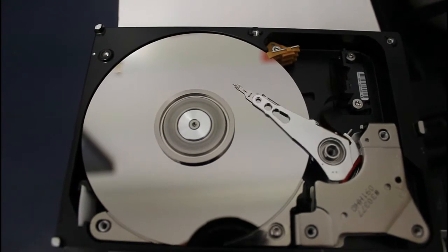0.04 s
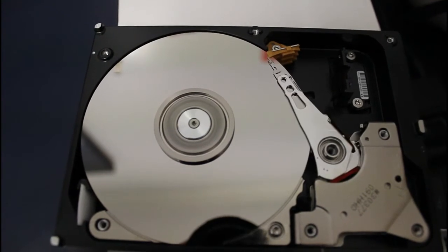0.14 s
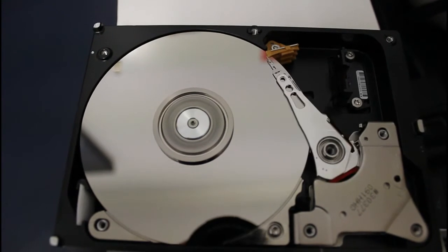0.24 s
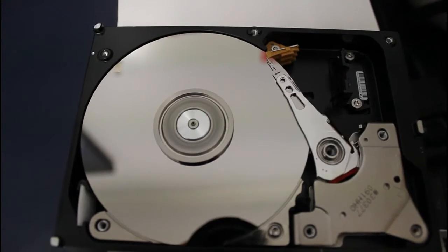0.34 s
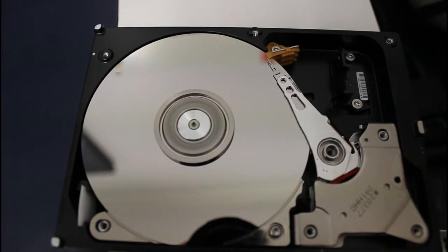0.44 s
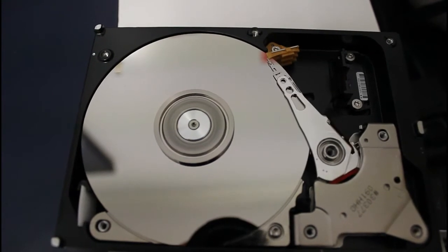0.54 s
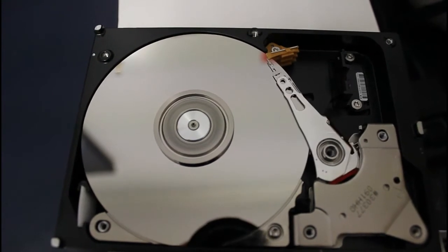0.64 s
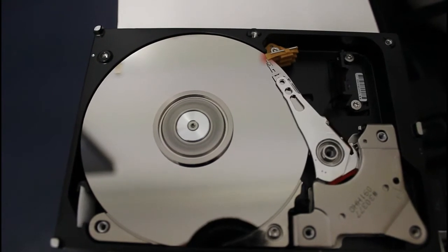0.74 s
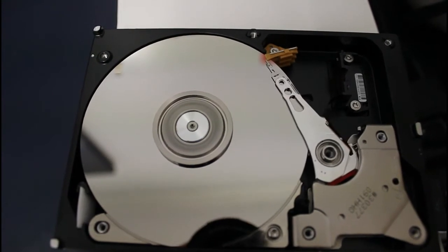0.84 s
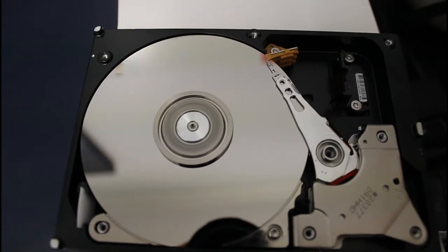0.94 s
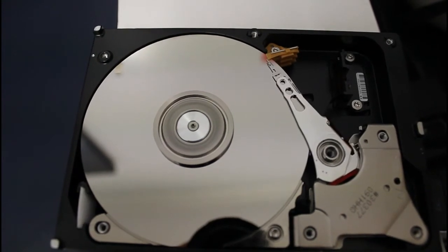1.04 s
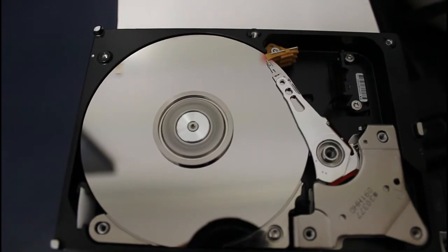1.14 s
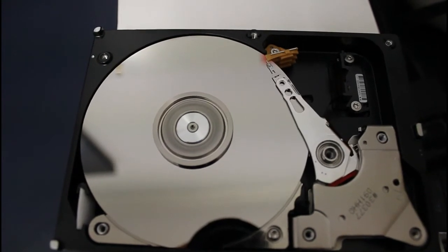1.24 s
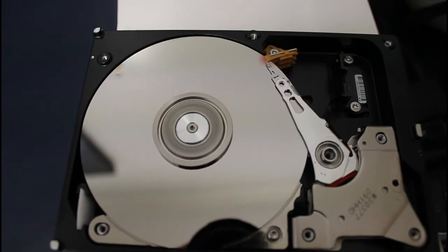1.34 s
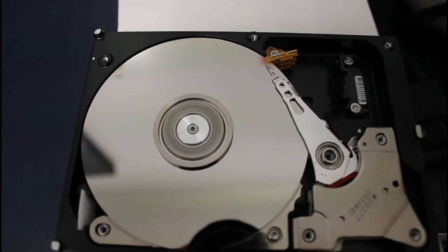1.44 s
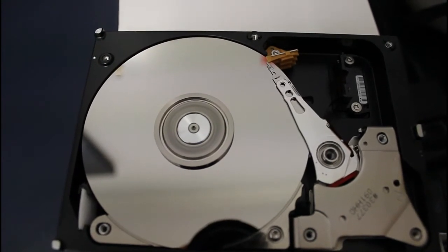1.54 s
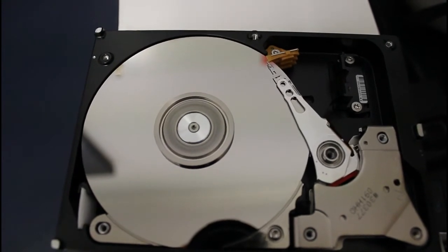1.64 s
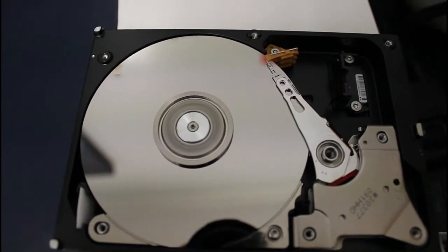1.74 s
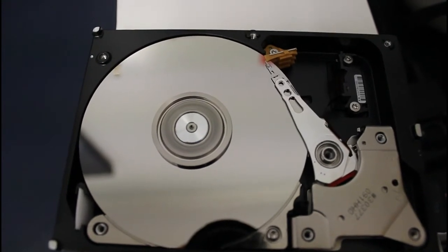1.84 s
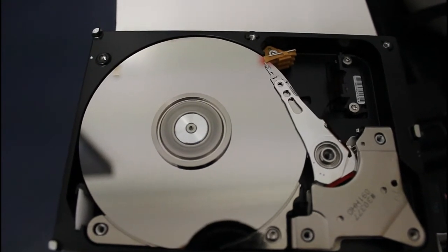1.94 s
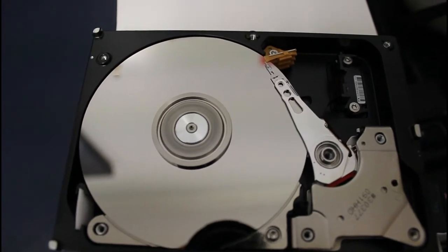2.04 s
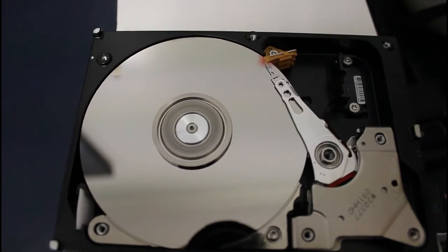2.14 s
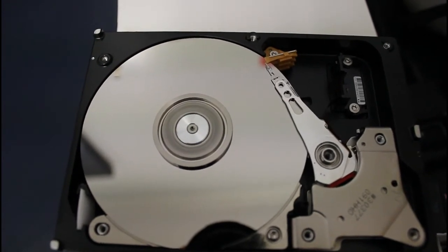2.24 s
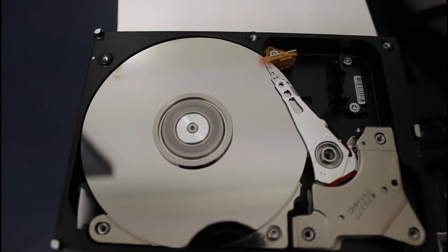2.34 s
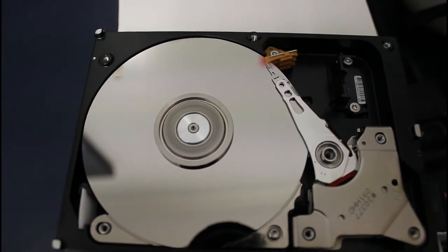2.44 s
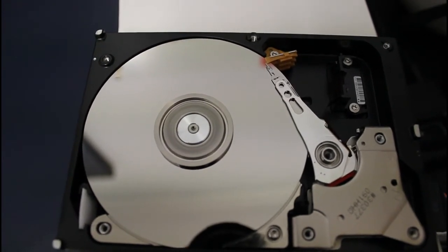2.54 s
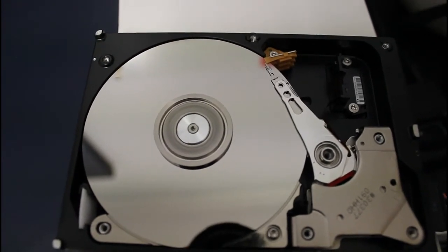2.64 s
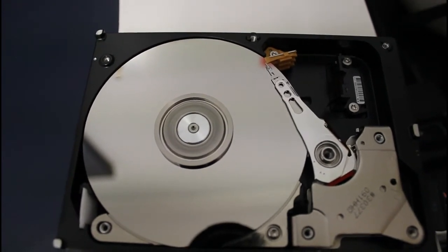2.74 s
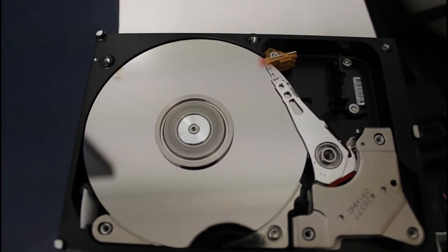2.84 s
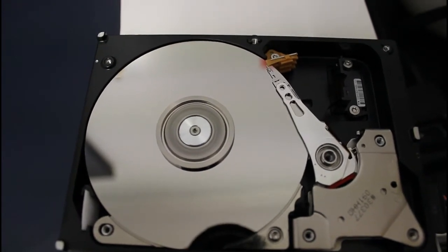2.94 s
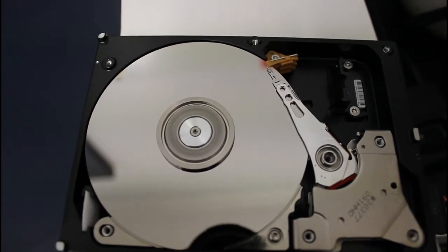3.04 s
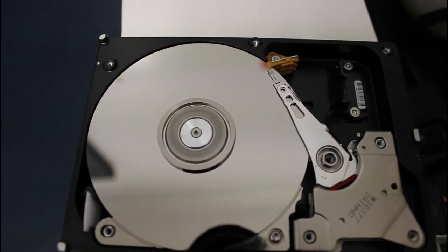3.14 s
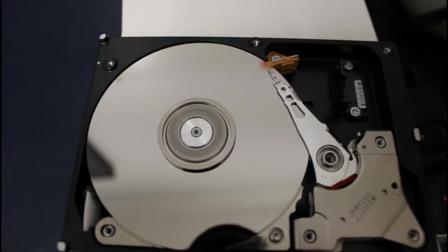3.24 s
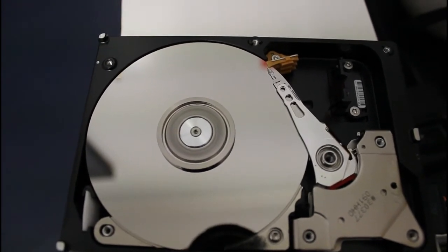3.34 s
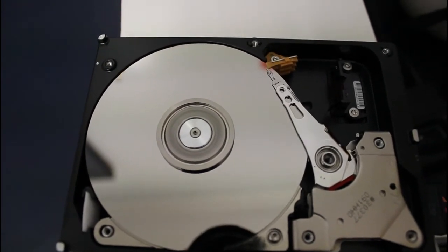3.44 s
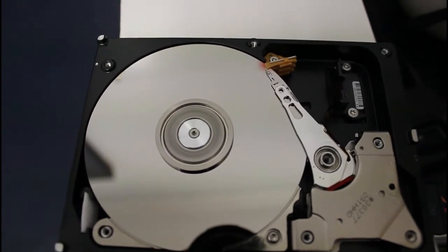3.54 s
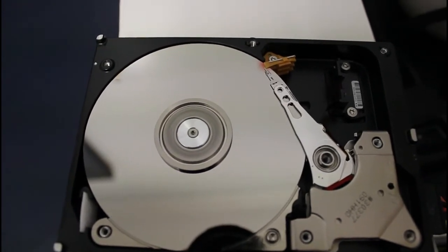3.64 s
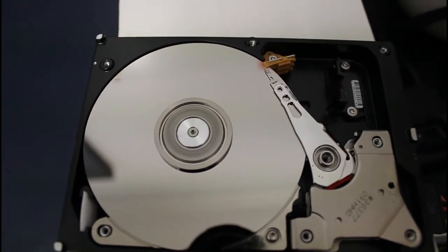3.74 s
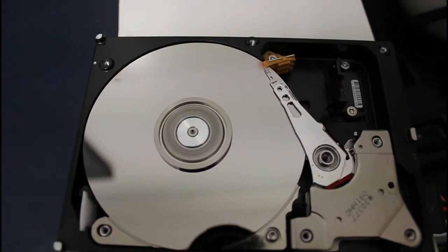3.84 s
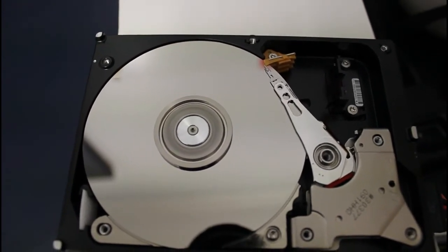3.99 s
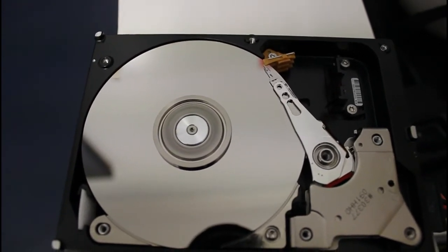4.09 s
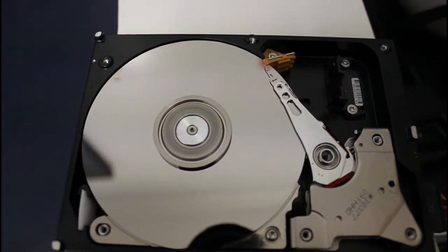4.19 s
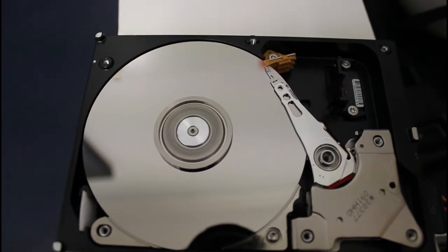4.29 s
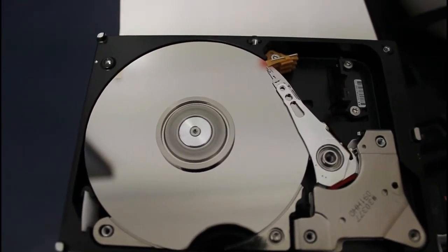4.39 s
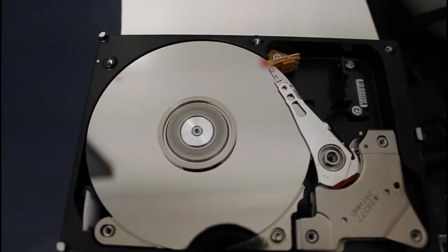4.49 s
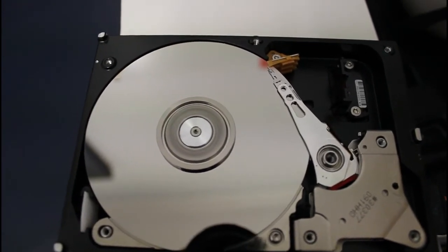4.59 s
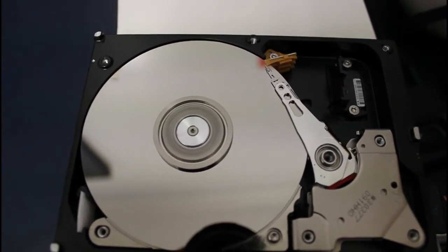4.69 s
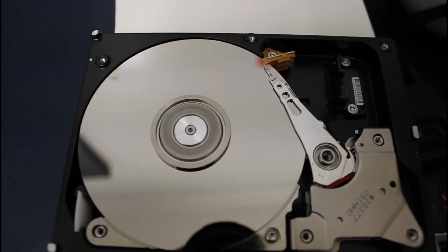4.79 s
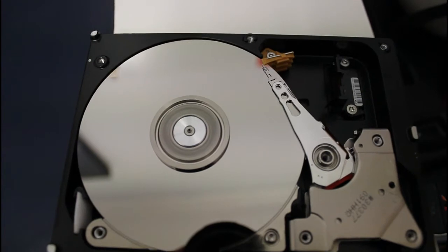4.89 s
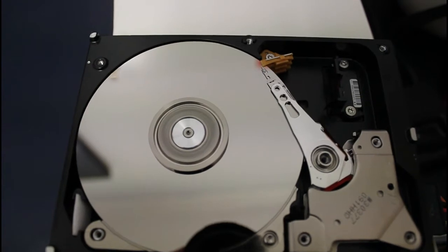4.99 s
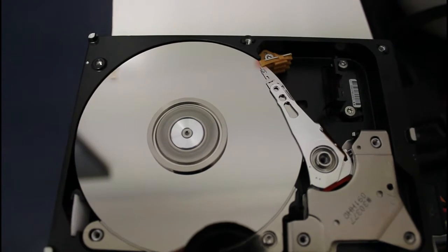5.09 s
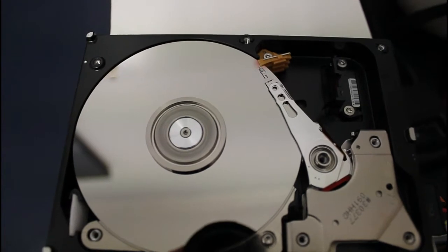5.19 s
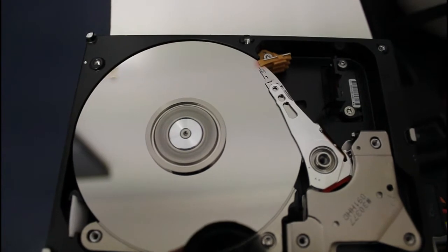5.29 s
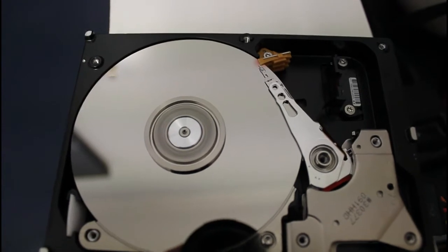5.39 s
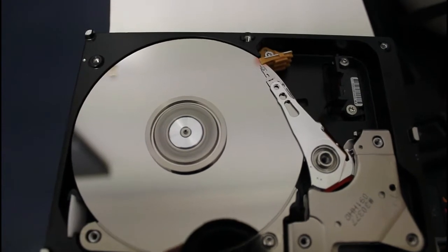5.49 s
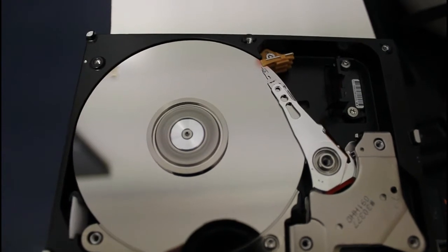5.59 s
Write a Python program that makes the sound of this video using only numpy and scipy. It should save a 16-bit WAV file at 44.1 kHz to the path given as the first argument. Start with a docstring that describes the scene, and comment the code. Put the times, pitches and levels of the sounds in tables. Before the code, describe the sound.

A spinning disk rushes steadily near a mono microphone in a quiet, faintly rumbling room. A tiny knock, brief high chirp and hard clack open it, ducking the level, which creeps back up. Buzzy high whine and rasp run, cut off, leave only hiss and barely heard bumps, then resume almost unbroken to the end.

```python
"""An opened hard drive spins close to a mono microphone, its platter hissing over faint hum and room rumble.
Right away the head arm knocks, sings briefly as it sweeps out, slams onto its parking ramp and rattles.
Then, in spells, the servo strains: the arm rasps, buzzes and whines, hunting between two high modes.
A few soft low bumps come later. The gain control starts held down, ducks under the slam and creeps back.
Hiss, rumble, buzz and rasp are shaped noise; hum and whines are wavering tones; blows are decaying modes."""
import sys
import numpy as np
from scipy import signal
from scipy.fft import rfft, irfft
from scipy.io import wavfile

SR = 44100
rng = np.random.default_rng(int(sys.argv[2]) if len(sys.argv) > 2 else 0)


def log_audio(samples):
    """Write samples as a 16-bit WAV file to the path given in sys.argv[1]."""
    # one column per channel
    frames = np.atleast_2d(samples).T
    # limit to full scale, then quantise
    limited = np.clip(frames, -1, 1)
    pcm = np.round(limited * 32767).astype(np.int16)
    wavfile.write(sys.argv[1], SR, pcm)


N = 247842
TIME = np.arange(N) / SR
FREQ = np.maximum(np.arange(N // 2 + 1) * SR / N, 1)
EDGE_S = 0.0036  # the coil current switches this fast


def undb(db):
    """Decibels to gain."""
    return 10 ** (np.asarray(db) / 20)


def noise(gain, db):
    """Noise shaped by a gain over frequency and set to an rms level."""
    shaped = irfft(rfft(rng.standard_normal(N)) * gain, N)
    return shaped * undb(db) / shaped.std()


def colour(points):
    """Gain over frequency, drawn through (Hz, dB) points on a log frequency axis."""
    hz, db = np.transpose(points)
    return undb(np.interp(np.log(FREQ), np.log(hz), db))


def resonance(hz, width):
    """Gain over frequency of a resonance with steep skirts."""
    return 1 / (1 + ((FREQ ** 2 - hz ** 2) / (FREQ * width)) ** 2)


def walk(rate):
    """Smooth random drift of spread 1 that moves about rate times a second."""
    return noise(1 / (1 + (FREQ / rate) ** 4), 0)


def tone(hz, db, wander_hz, flutter_db, rate):
    """A sine whose pitch and level waver at random around an rms level."""
    pitch = hz + wander_hz * walk(rate)
    phase = 2 * np.pi * (np.cumsum(pitch) / SR + rng.random())
    level = np.sqrt(2) * undb(db + flutter_db * walk(rate))
    return level * np.sin(phase)


def gate(start, end, attack_s):
    """On between two times: rises over attack_s, holds and cuts off quickly."""
    rise = (TIME - start) / attack_s
    fall = (end - TIME) / EDGE_S
    return np.clip(np.minimum(rise, fall), 0, 1)


# Spindle and mains hum, the spindle first. Each row: frequency in Hz, rms level in dB before flutter.
HUM_LINES = [(83.3, -61), (100, -74), (120.5, -56.5), (219.5, -57.5), (498.5, -60.5)]


def hum():
    """Steady low tones from spindle and mains, wavering slightly."""
    return sum(tone(hz, db, wander_hz=0.33, flutter_db=0.96, rate=4.6) for hz, db in HUM_LINES)


# Spectrum of the room rumble. Each row: frequency in Hz, relative density in dB per Hz.
ROOM_COLOUR = [(20, -31), (40, -20), (70, -9.5), (105, -1), (160, -3), (190, 0.5), (235, -5), (290, 0.5),
               (360, -11.5), (700, -10), (1500, -40)]


def room_rumble():
    """Steady low-weighted noise of the room."""
    return noise(colour(ROOM_COLOUR), db=-53.5)


# Spectrum of the air dragged round by the platter. Each row: frequency in Hz, relative density in dB per Hz.
AIR_COLOUR = [(150, -27), (400, -10.5), (600, -10), (800, -5.5), (1050, -4.0), (1300, -1.0), (1800, -3.0),
              (2400, -0.5), (3400, -1), (4400, -4.5), (6600, -5), (7400, -10), (8700, -13.5),
              (13000, -23.5), (15800, -33.0)]
# Platter and casing resonances stirred by that air. Each row: frequency in Hz, width in Hz,
# rms level in dB before flutter.
PLATTER_MODES = [(1417, 264, -42), (2076, 290, -41.5), (2484, 160, -47.5), (2686, 410, -39),
                 (3073, 200, -46.5), (3480, 250, -59.5), (4034, 310, -51.5), (4770, 400, -51),
                 (5546, 320, -45.5), (6340, 570, -50)]


def platter():
    """Turbulent air hisses over the disk and stirs its resonances, a little stronger once a turn."""
    air = noise(colour(AIR_COLOUR), db=-35.0)
    body = 0
    for hz, width, db in PLATTER_MODES:
        body += noise(resonance(hz, width), db) * undb(1.0 * walk(rate=17))
    spindle_hz = HUM_LINES[0][0]
    turn = 1 + 0.042 * np.sin(2 * np.pi * spindle_hz * TIME)
    return (air + body) * turn * undb(0.16 * walk(rate=15))


# Blows of the arm on its stop and ramp. Each row: start in seconds, relative level in dB,
# hardness in dB (tilt per octave of the ring above 2.8 kHz, and level of the crack).
ARM_CONTACTS = [(.0015, -8, -9.5), (0.08, -16, -9), (0.0951, -14, -3), (0.0974, -0.5, -1), (0.099, -7, 1),
                (0.108, -12, -5), (0.1115, -21, -4), (0.118, -5.5, -4), (.12, -9, -3), (.131, -15, -9),
                (0.14, -21, -9)]
# Modes of the struck drive. Each row: frequency in Hz, relative level in dB, 60 dB decay time in seconds.
STRUCK_MODES = [(195, -34, 0.2), (279, -31.5, 0.16), (733, -31, 0.038), (1270, -24, 0.026),
                (1620, -17.5, 0.024), (2030, -15, 0.034), (2463, -9, 0.025), (2770, -7, 0.012),
                (3000, -7.5, 0.021), (3400, -12, 0.045), (3750, -13.5, 0.023), (3930, -15, 0.018),
                (4810, -14, 0.026), (5590, -5.5, 0.015), (6340, -13, 0.023), (8130, -26, 0.011),
                (12700, -25, 0.015)]


def arm_blows():
    """Each contact rings the drive's modes and adds a short noise crack; harder contacts are brighter."""
    out = np.zeros(N)
    t = TIME[:SR // 6]
    contact = 1 - np.exp(-(t / 0.00014) ** 2)  # force builds in a fraction of a millisecond
    grit = noise(resonance(hz=3300, width=5000), db=-22.0)
    grit += noise(resonance(hz=12000, width=12000), db=-26)
    for start, db, hard_db in ARM_CONTACTS:
        # every contact point pushes each mode its own way
        detune = 1 + 0.0037 * rng.standard_normal(len(STRUCK_MODES))
        phase = 2 * np.pi * rng.random(len(STRUCK_MODES))
        ring = 0
        for k, (hz, mode_db, t60) in enumerate(STRUCK_MODES):
            tilt_db = hard_db * np.log2(max(hz / 2800, 1))
            decay = undb(mode_db + tilt_db - 60 * t / t60)
            ring += decay * np.sin(2 * np.pi * hz * detune[k] * t + phase[k])
        first = max(int(start * SR), 0)
        span = slice(first, first + len(t))
        crack = undb(hard_db - 60 * t / 0.018) * grit[span]
        out[span] += undb(db) * contact * (ring + crack)
    # the blows carry no deep bass
    bass_cut = signal.butter(4, 160, "high", fs=SR, output="sos")
    return signal.sosfilt(bass_cut, out) * undb(1.0)


# The first sweep of the arm across the disk: start in seconds, end in seconds.
SWEEP_SPAN = (0.008, 0.079)
# Modes the arm sings with on the way. Each row: frequency in Hz, rms level in dB before flutter.
SWEEP_TONES = [(4900, -36.5), (9450, -48), (11570, -48), (12470, -54)]


def arm_sweep():
    """The arm sings briefly in unsteady tones while it swings out towards the ramp."""
    song = sum(tone(hz, db, wander_hz=55, flutter_db=3.5, rate=140) for hz, db in SWEEP_TONES)
    return gate(*SWEEP_SPAN, EDGE_S) * song


# Spells in which the servo drives the arm. Each row: start in seconds, end in seconds,
# buzz and whine gain in dB, rasp gain in dB before strain, lean at the start in dB before hunting,
# run-up of the rasp in seconds before the start.
SERVO_SPELLS = [(0.135, 1.32, -0.15, -2, -4, .03), (3.316, 3.92, 0, -1, 3, 0.14),
                (3.936, 5.7, 0, -0.7, -2, .004)]


def spells():
    """The servo hunts at random and strains harder with time: gain of buzz and whine, of rasp, lean in dB."""
    strain_db_per_s, lean_db_per_s = 1.24, 3
    drive, load = np.zeros(N), np.zeros(N)
    # a positive lean favours the 9.5 kHz mode over the 12.5 kHz one
    lean_db = 5.5 * walk(rate=22)
    for start, end, drive_db, rasp_db, start_lean_db, run_up_s in SERVO_SPELLS:
        on = gate(start, end, EDGE_S)
        age = TIME - start
        drive += on * undb(drive_db)
        load += gate(start - run_up_s, end, run_up_s) * undb(rasp_db + strain_db_per_s * age)
        lean_db += on * (start_lean_db + lean_db_per_s * age)
    return drive, load, lean_db


# Arm resonances shaken by servo noise. Each row: frequency in Hz, width in Hz,
# rms level in dB before lean and drive, share of the lean.
ARM_MODES = [(1840, 50, -53.5, 0), (2750, 150, -43.5, 0), (3450, 140, -46.5, 0), (3800, 640, -46.5, 0),
             (4780, 380, -48.5, 0), (5060, 190, -47.0, 0), (5600, 460, -41.0, 0.05),
             (6250, 60, -49.0, -0.2), (7150, 60, -59.0, 0), (9330, 220, -48.0, 0.45),
             (9490, 70, -47.0, 0.55), (10660, 100, -59.0, -0.17), (11610, 80, -60.0, -0.08),
             (11940, 340, -54.5, -0.17), (14060, 270, -61.0, 0.1), (15190, 100, -61.0, -0.37)]
# Modes that sing by themselves. Each row: frequency in Hz, rms level in dB before flip, flutter and drive,
# share of the flip, flutter in dB.
SINGING_MODES = [(7150, -51.5, 0, 1.3), (11553, -53, -.12, 1.8), (12468, -51.5, -.6, 2)]


def servo():
    """The voice coil shakes the arm: noisy resonances, a low rasp and singing modes that trade energy."""
    drive, load, lean_db = spells()
    buzz = 0
    for hz, width, db, share in ARM_MODES:
        buzz += noise(resonance(hz, width), db) * undb(share * lean_db)
    # a singing mode saturates, so it flips between full and faint
    flip_db = 7.6 * np.tanh(lean_db / 4.5)
    whine = 0
    for hz, db, share, flutter in SINGING_MODES:
        whine += tone(hz, db + share * flip_db, wander_hz=9.5, flutter_db=flutter, rate=47)
    fizz = noise(resonance(hz=11800, width=7900), db=-51.0)
    rasp = noise(resonance(hz=2300, width=390), db=-35.5) * undb(0.14 * lean_db)
    return drive * undb(0.5 * walk(rate=8.9)) * (buzz + whine + fizz) + load * rasp


# Soft low bumps. Each row: centre in seconds, frequency in Hz, level in dB at the centre before flutter,
# time in seconds from the centre to 1/e.
SOFT_BUMPS = [(1.68, 195, -48, 0.051), (1.822, 271, -52, 0.056), (1.947, 308, -52.5, 0.14),
              (2.547, 292, -47, 0.018), (2.939, 275, -48, 0.013), (3.914, 312, -53, 0.045),
              (4.11, 277, -53, .06), (4.42, 286, -57, .06), (4.53, 320, -54, .04)]


def bumps():
    """Low wavering tones that swell and fade in a bell-shaped curve."""
    out = np.zeros(N)
    for centre, hz, db, length in SOFT_BUMPS:
        swell = np.exp(-((TIME - centre) / length) ** 2)
        out += tone(hz, db, wander_hz=14.4, flutter_db=1.0, rate=27.4) * swell
    return out


def scene():
    """All sources at one microphone, the same in both channels."""
    mono = hum() + room_rumble() + platter() + arm_blows() + arm_sweep() + servo() + bumps()
    return np.array([mono, mono])


def gain_control(x, limit_db, start_db, release_s):
    """Power over the limit turns the gain down fast; the cut, start_db deep at first, fades slowly."""
    power = signal.lfilter([1 / 128], [1, 1 / 128 - 1], x[0] ** 2)  # smoothed over about 3 ms
    over_db = np.maximum(10 * np.log10(power + 1e-12) - limit_db, 0)
    fade = np.exp(-TIME / release_s)
    # the deepest cut so far wins, each one fading from its own moment
    cut_db = fade * np.maximum.accumulate(np.maximum(over_db / fade, start_db))
    return x * undb(-cut_db)


def record(dry):
    """The camera rides its gain and cuts the top steeply above 15.75 kHz."""
    held = gain_control(dry, limit_db=-19.0, start_db=10.5, release_s=0.56)
    top_cut = signal.ellip(10, 0.2, 80, 15750, fs=SR, output="sos")
    return signal.sosfilt(top_cut, held)


dry = scene()
out = record(dry)
log_audio(out)
```